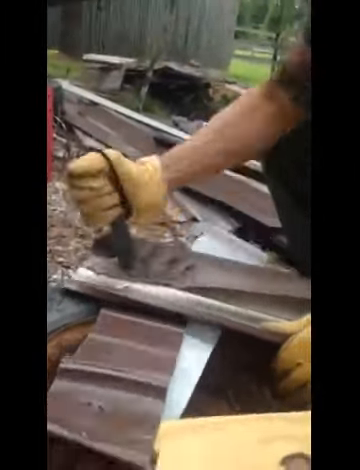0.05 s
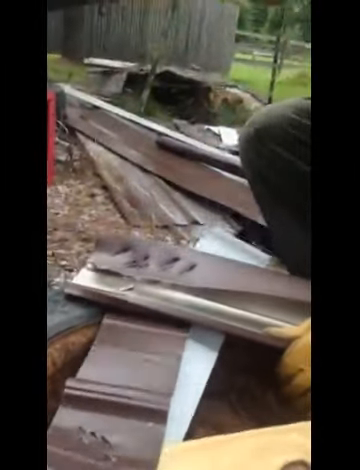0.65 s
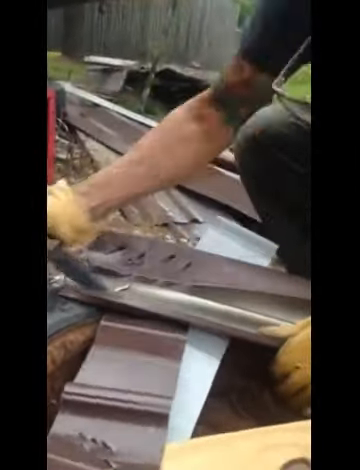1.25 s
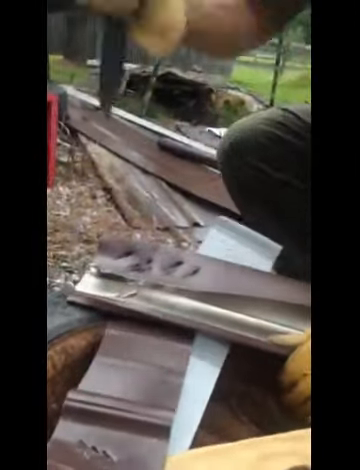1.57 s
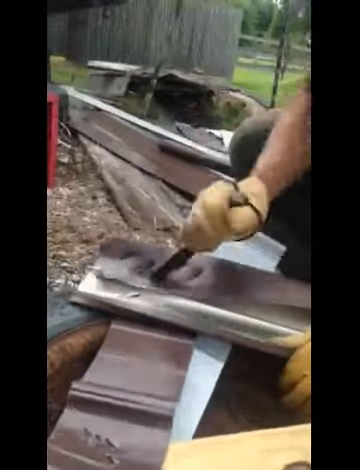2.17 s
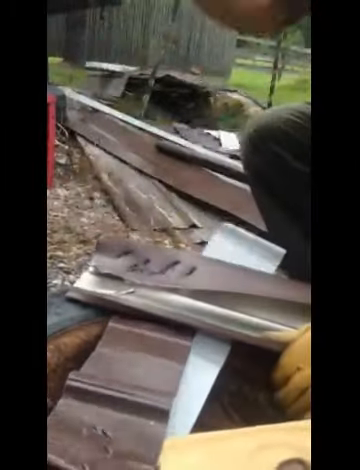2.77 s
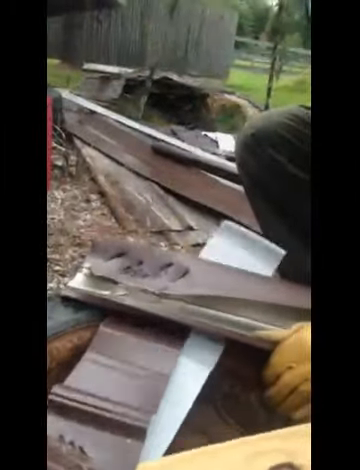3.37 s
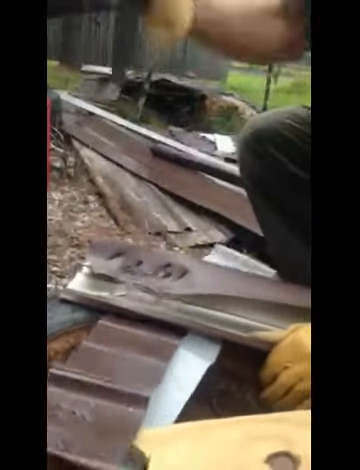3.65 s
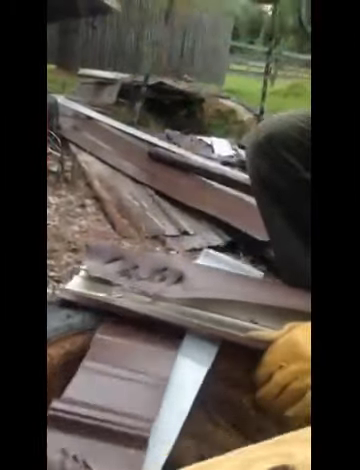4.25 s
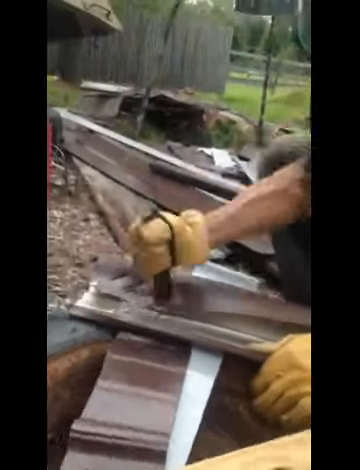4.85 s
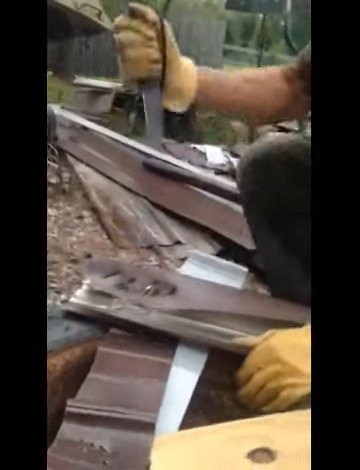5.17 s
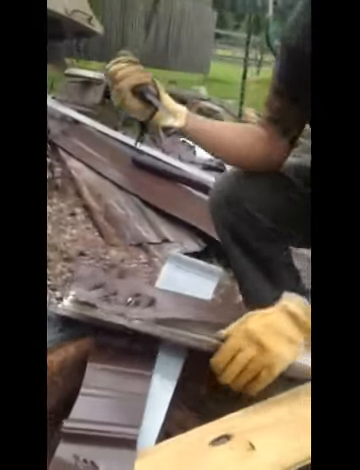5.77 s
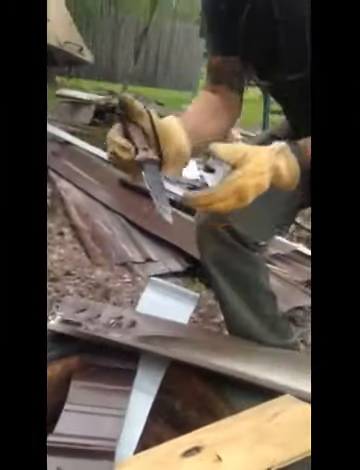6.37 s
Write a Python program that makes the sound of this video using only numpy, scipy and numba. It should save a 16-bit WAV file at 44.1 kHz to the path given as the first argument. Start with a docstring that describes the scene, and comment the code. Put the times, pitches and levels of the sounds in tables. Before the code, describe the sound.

A heavy knife punches through thin metal roofing sheet on a scrap pile, heard close up over faint, steady outdoor air. The first stab lands immediately, with more at about 1.0, 1.9 and 2.6 seconds. The pace then quickens, with blows at 3.1, 3.6, 4.0, 4.4 and 4.9 seconds. Each is a loud, slightly squashed metallic crash with a brief tearing chatter, a low thud from the pile and a short ring, followed by the rasp of the blade pulling out. Between stabs the sheet knocks, scrapes and buckles with hollow clunks, most clearly around 0.4, 1.5 and 2.2 seconds. After the last stab the blade drags free, and a ringing clunk and a scrape come at about 5.5 to 5.8 seconds. Two faint taps follow near 6.0 and 6.3 seconds, leaving only the outdoor air.

```python
"""Over faint outdoor air, a heavy knife is stabbed nine times through thin roofing sheet on a scrap pile.
Each stab dents the sheet, then punches through: the impact excites its bending modes and the pile thuds.
The metal tears and chatters, the panel buckles, and the blade rubs back out by stick-slip friction.
Knocks, scrapes and clunks follow between the stabs and thin out after the last one, near 5 s.
A nearby phone's limiter flattens each crash, so the ring falls away only once it is below the ceiling."""
import sys
import numpy as np
from scipy import signal
from scipy.fft import rfft, irfft
from scipy.io import wavfile
from scipy.ndimage import uniform_filter1d, map_coordinates
from numba import njit

SR = 44100
rng = np.random.default_rng(int(sys.argv[2]) if len(sys.argv) > 2 else 0)


def to_wav(s):
    """Save 16-bit WAV."""
    ch = np.atleast_2d(s).T  # columns
    pcm = np.round(np.clip(ch, -1, 1) * 32767)  # PCM
    wavfile.write(sys.argv[1], SR, pcm.astype(np.int16))


N = 291060
SIZE = 49152  # samples in one event
T = np.arange(SIZE) / SR
HZ = np.fft.rfftfreq(SIZE, 1 / SR)


def undb(db):
    """Amplitude ratio of a level in decibels."""
    return 10 ** (np.asarray(db) / 20)


def unit(x):
    """Normalisation to unit energy."""
    return x / np.sqrt(np.sum(x ** 2))


def loudest(x, db):
    """Normalisation of the greatest 10 ms RMS level to db."""
    return x * undb(db) / np.sqrt(uniform_filter1d(x ** 2, size=440, mode="constant").max())


def fade(t60):
    """Exponential damping: 60 dB in t60 seconds."""
    return np.exp(-np.log(1000) * T / max(t60, 1 / SR))


def colour(hz, points):
    """Spectral envelope: the gain at hz, interpolated from (frequency [Hz], level [dB]) points."""
    f, db = np.transpose(points)
    return undb(np.interp(np.log(hz + 1), np.log(f), db))


def add(out, s, x):
    """Superposition of x on out from time s."""
    start = max(int(s * SR), 0)
    out[start:start + len(x)] += x[:N - start]


# spectrum of the outdoor background: (frequency [Hz], relative density [dB])
AIR_SPECTRUM = [(25, -22), (55, -7), (90, 10), (150, -8.5), (190, -8), (232, 1.5), (300, -10), (410, -4),
                (600, -9), (1400, -17), (4000, -21.5), (15000, -26)]


def outdoor_air(db=-53):
    """Stationary coloured noise: faint, even outdoor air."""
    air = irfft(rfft(rng.standard_normal(N)) * colour(np.fft.rfftfreq(N, 1 / SR), AIR_SPECTRUM), N)
    return unit(air) * np.sqrt(N) * undb(db)


# prominent modes of the sheet: (frequency [Hz], relative level [dB], decay time t60 [s])
SHEET_MODES = [(231.8, -25, 0.5), (406, -30, 0.27), (427, -18.5, .45), (520, -37, 0.23), (777, -27.5, 1.4),
               (1030, -34, 1.2), (1070, -14.5, 0.39), (1344, -27, 1.3), (1460, -40, 1.8), (1775, -19, 0.53),
               (1820, -32, 1.5), (2330, -28, 1.3), (2650, -46, 0.85), (2790, -46, 0.35), (3130, -26, .7),
               (7440, -30, 0.33), (10150, -32, .12)]


def sheet_modes(count=130, minor_db=-33, minor_t60=0.9):
    """Normal modes: frequencies and damped sinusoids of the prominent modes and many weaker ones."""
    minor_hz = np.exp(rng.uniform(np.log(700), np.log(8000), count))
    modes = SHEET_MODES + [(hz, minor_db, minor_t60 / max(hz / 2800, 1)) for hz in minor_hz]
    tones = [undb(db) * unit(np.sin(2 * np.pi * (hz * T + rng.random())) * fade(t60))
             for hz, db, t60 in modes]
    return np.array([mode[0] for mode in modes]), np.array(tones)


def excited(force, t60):
    """Energy balance: the amplitude of a resonator that stores each contact's energy and leaks it."""
    retained = np.exp(-2 * np.log(1000) / (max(t60, 1 / SR) * SR))
    return np.sqrt(signal.lfilter([1 - retained], [1, -retained], force ** 2 + 1e-18))


# damping of the sheet's dense modes: (frequency [Hz], decay time t60 [s])
BAND_DECAY = [(60, 0.88), (250, 0.82), (700, 0.53), (1900, 0.46), (4800, 0.36), (9000, 0.21), (15000, 0.17)]


def dense_wash(spectrum, force):
    """Modal overlap: buckling blurs the dense modes into noise, whose high bands die first."""
    centres, t60s = np.transpose(BAND_DECAY)
    wash = 0
    for share, t60 in zip(np.eye(len(centres)), t60s):
        band = np.interp(np.log(HZ + 1), np.log(centres), share)
        wash = wash + irfft(spectrum * band) * excited(force, t60)
    return wash


def spot_colour(ripple_db=2.0, count=200):
    """Modal coupling: each point of contact favours some groups of modes and starves others."""
    ripple = np.interp(np.sqrt(HZ / HZ[-1]), np.linspace(0, 1, count), rng.standard_normal(count))
    return undb(ripple_db * ripple)


# spectrum of the struck sheet: (frequency [Hz], relative density [dB])
SHEET_SPECTRUM = [(40, -66), (110, -17), (180, -10.5), (232, -5.5), (295, -8.5), (430, 1), (720, -0.5),
                  (840, -5.5), (1100, -1), (1600, -4), (3100, -5), (4200, -8.5), (9000, -14), (15000, -20)]


def sheet(modes, force, db, boom_db, treble_db, crack_db, crack_t60=0.04, pings_db=-2, detune=0.00409):
    """Forced response of a thin plate: a crack at each contact, brief pings, a wash and lasting tones."""
    force = unit(force)
    # a broad, soft contact favours the boom, a sharp edge the treble
    contact = [(35, boom_db - 6), (130, boom_db), (600, boom_db), (1700, 0), (2900, 0), (9000, treble_db)]
    spectrum = rfft(rng.standard_normal(SIZE)) * colour(HZ, SHEET_SPECTRUM) * spot_colour()
    spectrum = spectrum / np.std(irfft(spectrum)) * colour(HZ, contact)
    wash = dense_wash(spectrum, force)
    # short bending waves radiate at once, before they spread over the sheet
    crack_tilt = colour(HZ, [(120, -4), (400, -2), (1500, -3.5), (6000, -1)])
    crack = irfft(1j * spectrum * crack_tilt) * excited(force, crack_t60)
    pitches, tones = modes
    ring = (rng.standard_normal(len(pitches)) * colour(pitches, contact)) @ tones
    # pressure on the sheet detunes the modes slightly, anew for each event
    ring = map_coordinates(ring, [np.arange(SIZE) * (1 + detune * rng.standard_normal())], order=1)
    # gentle contacts leave the sheet unbuckled, so more of their sound is clean tone
    clean = signal.fftconvolve(force, ring)[:SIZE] * undb(-.16 * (db + 9))
    return loudest(wash + undb(crack_db) * crack + undb(pings_db) * pings(force, contact) + clean, db)


def pings(force, contact, count=120, samples=8192, ping_t60=0.28, spread_db=2):
    """Local resonance: hard contacts ring small patches and torn tongues, each at its own pitch."""
    out, t = np.zeros(SIZE + samples), T[:samples]
    power = force ** 2
    starts = np.searchsorted(np.cumsum(power), rng.random(count) * np.sum(power))
    pitches = np.exp(rng.uniform(np.log(450), np.log(7000), count))
    strength = np.sqrt(uniform_filter1d(power, size=2000, mode="constant")[starts] + 1e-12)
    shading = colour(pitches, SHEET_SPECTRUM) * colour(pitches, contact) * pitches ** .4
    gains = strength * shading * undb(spread_db * rng.standard_normal(count))
    for start, hz, gain in zip(starts, pitches, gains):
        t60 = ping_t60 * min((1500 / hz) ** .5, 1)
        out[start:start + samples] += gain * np.sin(2 * np.pi * hz * t) * np.exp(-np.log(1000) * t / t60)
    return unit(out[:SIZE])


def clicks(per_s, spread_db):
    """Poisson impulse train: random metal-on-metal contacts, a few much harder than the rest."""
    hit = rng.random(SIZE) < per_s / SR
    return hit * rng.choice([-1, 1], SIZE) * undb(spread_db * np.minimum(rng.standard_normal(SIZE), 2))


def blow(t60):
    """Impact force: a decaying burst of impulses as the metal gives way."""
    return unit(clicks(per_s=6000, spread_db=7.5) * fade(t60))


# steel dragging over torn edges: (time [s], duration [s], level [dB], boom [dB], treble [dB])
EDGE_SCRAPES = [(0.492, 0.062, -22, 5.5, -0.5), (0.83, 0.16, -39, 0, -6), (1.429, .13, -20, 0.5, -6),
                (1.5, .075, -16, 6.5, 2), (2.139, 0.15, -26.5, -2.5, 3), (2.494, 0.097, -21.5, 2.5, -2.5),
                (2.997, 0.14, -34, 0, -5), (4.374, .05, -27.5, -2, -0.5), (5.412, 0.14, -35, 2, -13.5),
                (5.645, 0.17, -17, -5.5, -1.5)]


def scrapes(out, modes, rise_s=0.0017, fall_s=0.011):
    """Stick-slip friction: a run of small contacts rings the sheet."""
    for s, length, db, boom_db, treble_db in EDGE_SCRAPES:
        pressure = np.clip(np.minimum(T / rise_s, (length - T) / fall_s), 0, 1)
        force = clicks(per_s=900, spread_db=5) * pressure
        add(out, s, sheet(modes, force, db, boom_db, treble_db, crack_db=2.5))


def snap(db, hz, t60, width, onset_db=3):
    """Snap-through buckling: a piece of sheet flips over and rings in one band of modes around hz."""
    detuning = (HZ / hz - hz / (HZ + 1)) / width
    band = irfft(rfft(rng.standard_normal(SIZE)) / (1 + (detuning / 1.6) ** 2) ** 0.81)
    return loudest(band * (fade(t60) + undb(onset_db) * fade(0.034)), db)


# panels and flaps snapping over: (time [s], level [dB], frequency [Hz], t60 [s], relative width [1])
PANEL_CLUNKS = [(0.434, -14, 4840, .054, 0.26), (0.563, -19.5, 1820, 0.14, 0.2),
                (0.821, -32.5, 495, 0.51, 0.25), (1.406, -25, 800, 0.36, 0.67),
                (1.537, -11.5, 490, .35, 0.49), (1.556, -13, 1030, .28, 0.42),
                (2.202, -12, 734, 0.24, 0.042), (4.889, -7.5, 666, 0.094, 0.17),
                (5.547, -13.5, 622, 0.7, 0.37), (5.696, -25.5, 270, 0.47, 0.24),
                (5.925, -39.5, 786, .92, 0.01)]


def clunks(out):
    """Elastic instability: panels and torn flaps snap over, each with its own resonance."""
    for s, db, hz, t60, width in PANEL_CLUNKS:
        add(out, s, snap(db, hz, t60, width))


# knocks of blade and sheet: (time [s], level [dB], boom [dB], treble [dB])
SHEET_KNOCKS = [(0.325, -22.5, 2, -1), (0.395, -13.5, -1, 10), (0.411, -15.5, 4, 3), (0.432, -11, 0.5, -6),
                (0.477, -18.5, 17, 12), (0.669, -31, 1, -3), (0.789, -36.5, -4, -3), (1.423, -19, -6, -6.5),
                (2.202, -7, 5.5, 2), (2.320, -12, 6, 8), (2.458, -20.5, 2, -1.5), (2.997, -31, -5, -1),
                (3.403, -21, -5, 1), (3.464, -21, 0, 3.5), (3.887, -24, 15, 4.5), (3.981, -31, -16.5, 18),
                (4.228, -18, -11, 2.5), (4.337, -25, -.5, -0.5), (4.665, -16, -1.5, 1),
                (4.867, -27, -1, -1), (5.328, -24.5, -7, -0.5), (5.548, -20.5, 1.5, -3),
                (5.976, -35, 3.5, -1), (6.292, -36.5, -1.5, 1)]


def knocks(out, modes, bounce_s_per_db=.0012, low_cut_hz=90):
    """Impacts too light to shake the pile: sharper ones crack more, lighter ones bounce for longer."""
    low_cut = signal.butter(1, low_cut_hz, "high", fs=SR, output="sos")
    for s, db, boom_db, treble_db in SHEET_KNOCKS:
        lightness_db = max(-13.5 - db, 0)
        force = blow(t60=0.025 + bounce_s_per_db * lightness_db)
        crack_db = -1 + 0.6 * treble_db - 0.18 * lightness_db
        tap = sheet(modes, force, db, boom_db, treble_db, crack_db)
        add(out, s, signal.sosfilt(low_cut, tap))


def catching(per_s=40, depth_db=2):
    """Random amplitude modulation: the pressure of an edge that catches and gives way."""
    steps = rng.standard_normal(256)
    return undb(depth_db * np.interp(T * per_s, np.arange(len(steps)), steps))


def drag(modes, start_s, free_s, db, ramp_s=.02, ease_t60=1.4, snag_db=13.5):
    """Sliding friction: the blade rubs out of the slit with easing pressure, snagging on burrs."""
    pressure = np.clip(np.minimum(T - start_s, free_s - T) / ramp_s, 0, 1) * fade(ease_t60) * catching()
    rubbing = clicks(per_s=700, spread_db=6.5)
    snags = undb(snag_db) * clicks(per_s=25, spread_db=1.5)
    return sheet(modes, (rubbing + snags) * pressure, db, boom_db=-4, treble_db=1.0, crack_db=1.0)


def puncture(modes, db, tear_s, boom_db, treble_db, tear_db=5.5, thud_db=-17.5):
    """Impact and fracture: the point punches through, the tearing metal chatters and the pile thuds."""
    chatter = unit(clicks(per_s=800, spread_db=6) * np.exp(-(T / tear_s) ** 2.2) * catching())
    force = blow(t60=.04) + undb(tear_db) * chatter
    pile = colour(HZ, [(22, -35), (60, -13), (130, -1), (300, -8.0), (1200, -51)])
    thud = unit(irfft(rfft(rng.standard_normal(SIZE)) * pile)) * np.sqrt(SIZE) * fade(0.12)
    crash = sheet(modes, force, db, boom_db, treble_db, crack_db=-4.0)
    return crash + undb(thud_db) * thud


# knife strokes: (time [s], level [dB], tearing time [s], delay until the blade is free [s],
# drag level [dB], boom [dB], treble [dB], buckling delay [s], buckling level [dB])
KNIFE_STABS = [(0.005, -1.5, .13, 0.18, -9, 0, 1, 0.068, -14),
               (0.959, -3.5, 0.14, 0.37, -15.5, -0.5, 1.5, 0.0044, -2),
               (1.887, -1, 0.099, 0.2, -22.5, 1, 1, 0.059, -9.5),
               (2.610, -3, 0.16, 0.34, -19, 1.5, 2.5, 0.036, -7.5),
               (3.108, -3, 0.14, 0.36, -24.5, 1, 1.5, 0.053, -13.5),
               (3.559, -0.5, 0.099, 0.29, -17, 2, 1, .052, -2),
               (4.000, -3, .145, 0.15, -29.5, 1.5, 2.5, 0.086, -21),
               (4.435, -3.5, 0.1, .37, -15.5, -1, 4, 0.0099, -25),
               (4.890, -5, 0.12, 0.51, -16.5, 3, 2, 0.093, -12)]


def stabs(out, modes, dent_lead_s=0.013):
    """Point loading to failure: the sheet dents, is pierced and buckles hollowly; the blade drags out."""
    for s, db, tear_s, free_s, drag_db, boom_db, treble_db, buckle_s, buckle_db in KNIFE_STABS:
        add(out, s - dent_lead_s, snap(db=-33, hz=550, t60=0.3, width=1.4))
        add(out, s, puncture(modes, db, tear_s, boom_db, treble_db))
        add(out, s, drag(modes, tear_s, free_s, drag_db))
        add(out, s + buckle_s, snap(buckle_db, hz=471, t60=0.26, width=0.17))


def scene():
    """Superposition at one microphone: the outdoor air and all contacts on the one sheet."""
    out, modes = outdoor_air(), sheet_modes()
    stabs(out, modes)
    knocks(out, modes)
    clunks(out)
    scrapes(out, modes)
    return np.array([out, out])


@njit
def follow(x, attack, release):
    """Envelope detection: rectification, then smoothing with separate rates of rise and fall."""
    out, level = np.empty(len(x)), 0.
    for i in range(len(x)):
        level += (abs(x[i]) - level) * (attack if abs(x[i]) > level else release)
        out[i] = level
    return out


def record(dry, ceiling_db=-2.5, attack_s=0.00025, release_s=0.04, low_cut_hz=42, top_hz=15300):
    """Band and peak limiting: the phone drops both ends of the spectrum and holds the crashes down."""
    heard = signal.sosfilt(signal.butter(2, low_cut_hz, "high", fs=SR, output="sos"), dry)
    envelope = follow(heard[0], min(1 / (attack_s * SR), 1), 1 / (release_s * SR))
    ahead = np.interp(np.arange(N) + 0.002 * SR, np.arange(N), envelope)  # 2 ms look-ahead
    held = heard / np.maximum(ahead / undb(ceiling_db), 1)
    rounded = 1.1 * np.tanh(held / 1.1)
    return signal.sosfilt(signal.ellip(10, .2, 70, top_hz, fs=SR, output="sos"), rounded)


dry = scene()
out = record(dry)
to_wav(out)
```